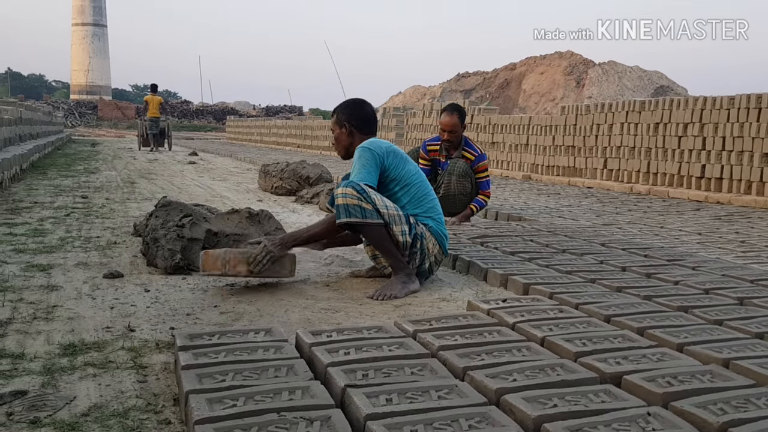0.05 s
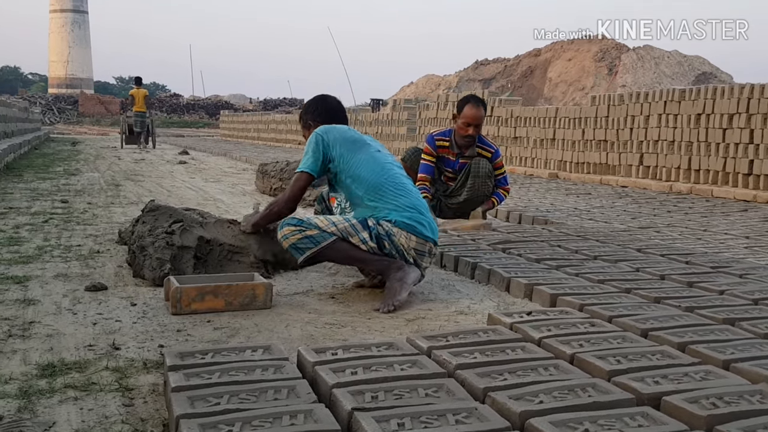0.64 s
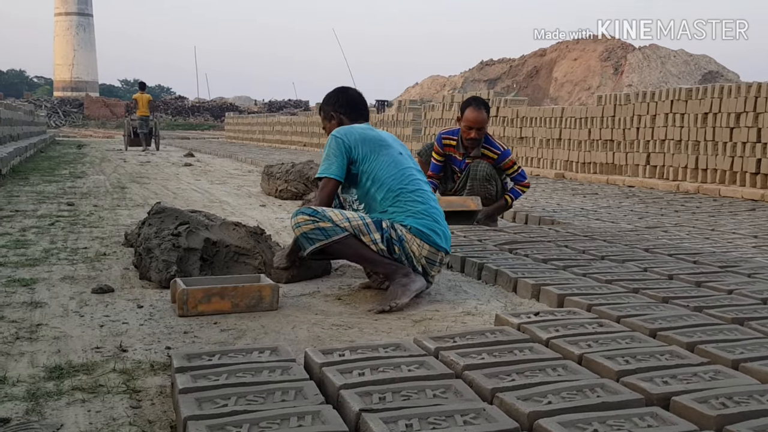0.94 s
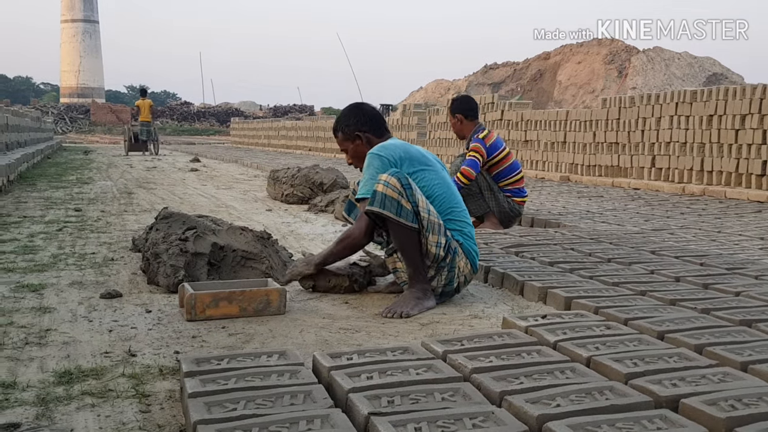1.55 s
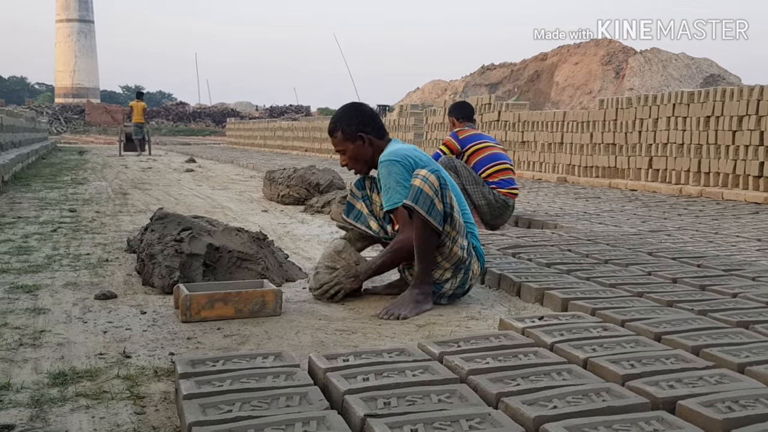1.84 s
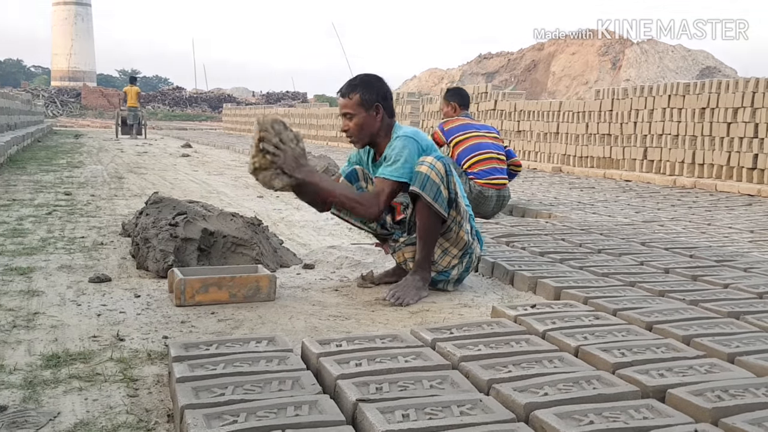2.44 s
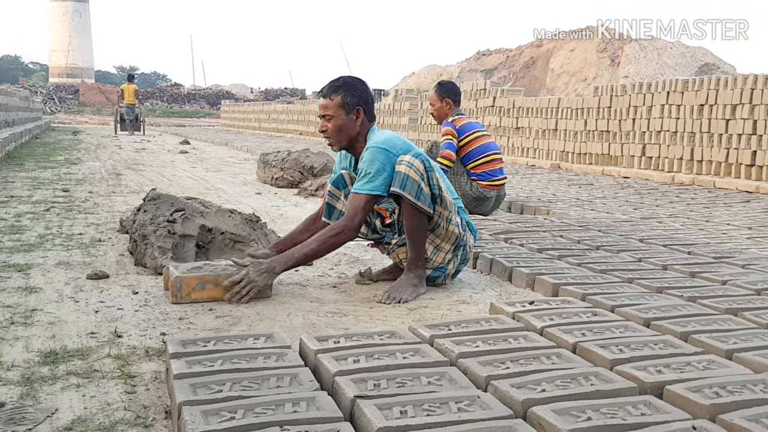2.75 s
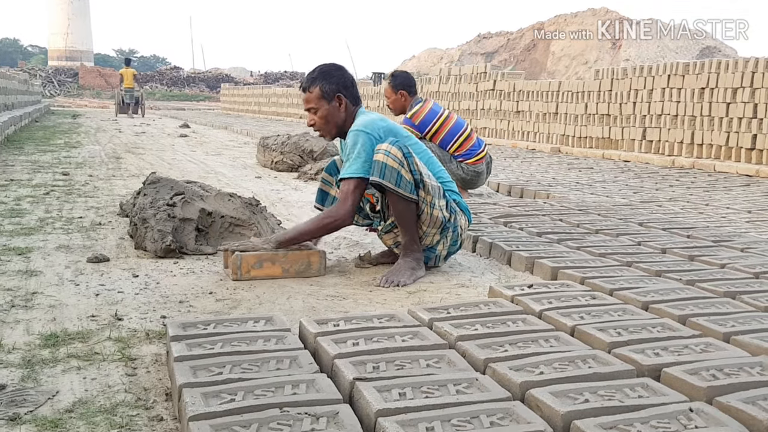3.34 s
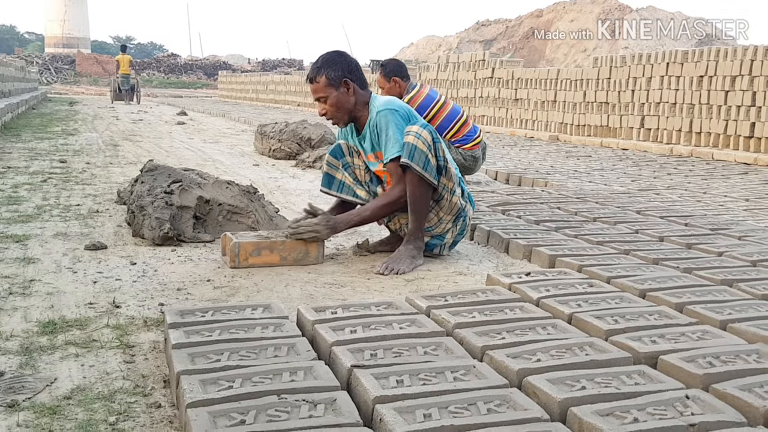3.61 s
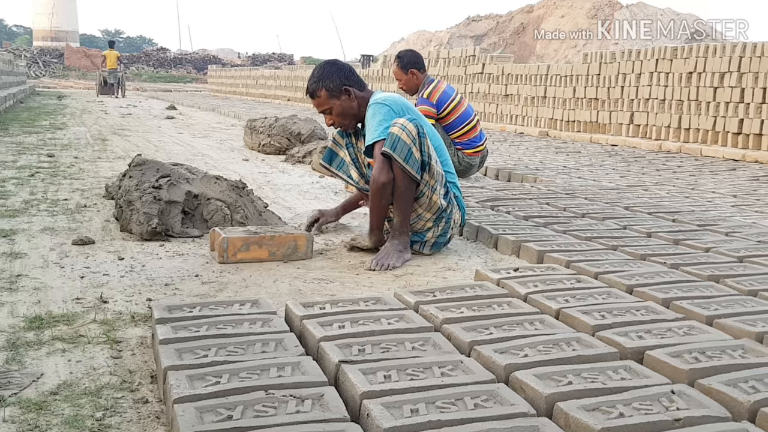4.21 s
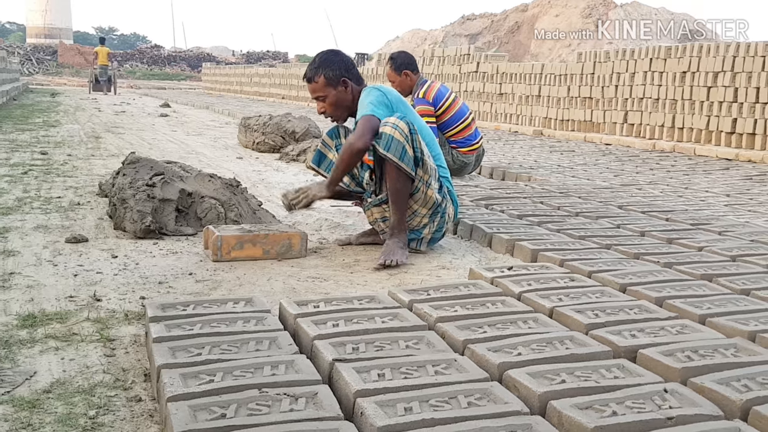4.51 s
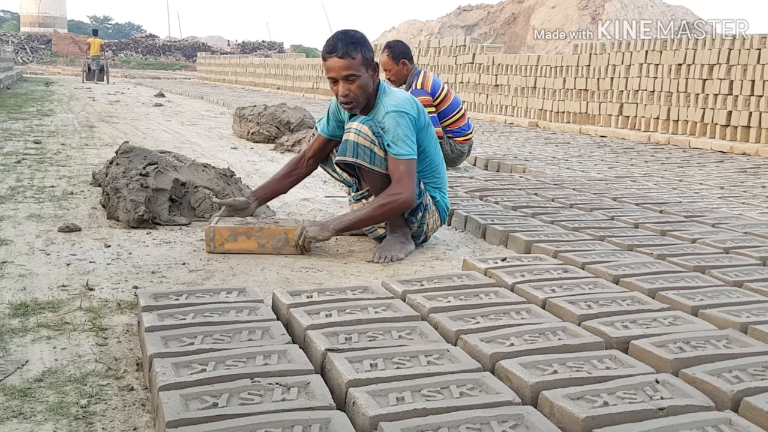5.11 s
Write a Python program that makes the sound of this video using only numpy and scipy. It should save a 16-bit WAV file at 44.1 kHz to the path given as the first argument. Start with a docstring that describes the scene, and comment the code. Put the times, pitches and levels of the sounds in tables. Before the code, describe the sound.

A slow one-cylinder diesel engine chugs across an open brick yard throughout, about eight low puffs a second over a soft rumble. Close by, at 0.1 seconds, an empty wooden mould lands with a hollow double knock. Hands slap and squish wet clay at 0.3 and 0.5 seconds, then give one heavy, hollow smack at 1.1, the loudest slap. Lighter pats come at 1.6 and 2 seconds as the lump is rolled in faintly hissing sand. At 2.7 seconds the clay splats into the mould. Two soft wooden knocks follow at 3, and at 3.3 the full mould hits the earth with a strong, dull, slightly gritty thump. A light knock and pat come near 3.7, a small click just after 4, and quiet smears near 4.9. Small birds whistle faintly far off now and then.

```python
"""A brick moulder works on open ground. First his empty wooden mould knocks down and rings; then he
slaps the wet clay, tears off a lump and rolls it in hissing sand. At 2.7 s the lump splats into the
mould, at 3.3 s the full mould is bumped on the earth, and a light knock, a click and smears follow.
Throughout, the exhaust puffs of a slow one-cylinder diesel echo off brick stacks across the yard,
and small birds whistle far off."""
import sys
import numpy as np
from scipy import signal
from scipy.fft import rfft, irfft
from scipy.io import wavfile
from scipy.ndimage import uniform_filter1d

SR = 44100
rng = np.random.default_rng(int(sys.argv[2]) if len(sys.argv) > 2 else 0)


def unload_audio(sound):
    """Save the sound as a 16-bit wav file, at the path given as the first command line argument."""
    columns = np.transpose(np.atleast_2d(sound))
    # keep every value between -1 and 1, then stretch to whole-number steps
    steps = np.round(np.clip(columns, -1, 1) * 32767)
    wavfile.write(sys.argv[1], SR, steps.astype(np.int16))


N = 227905
TIME = np.arange(N) / SR
AGE = TIME[:SR // 2]  # time since a blow [s]

# palms on clay: (time [s], smack [dB], pitch of the palm's hollow [Hz], lump thud [dB], trapped air [dB])
SLAPS = [(0.291, -31, 420, -52, -58), (0.3038, -32, 404, -20.5, -30.5), (0.457, -27.5, 301, -53, -48),
         (0.497, -36, 321.3, -48, -41.5), (1.069, -13.5, 399.4, -17.5, -17), (1.643, -29.5, 384, -45, -34),
         (1.976, -52, 407, -30.5, -54), (2.073, -45.5, 522, -58, -54), (3.76, -38, 514, -54, -44.5)]
# air pocket under a cupped palm: (frequency [multiple of the hollow's pitch], level [dB], peak time [s])
POCKET_PARTIALS = [(1.001, 0, .0195), (1.87, -18.5, 0.0091)]
# clay squeezed by hand: (time [s], level [dB], pitch of the hand's hollow [Hz], decay time [s])
SMEARS = [(0.301, -50, 790, 0.02), (0.461, -56.5, 740, .03), (.498, -48.5, 710, .012),
          (.951, -55, 512, 0.024), (1.642, -48, 1140, 0.012), (1.921, -66, 1603, .04),
          (2.285, -61, 900, 0.05), (3.003, -57, 1100, 0.044), (3.735, -60, 1090, 0.031),
          (3.756, -53.5, 539, 0.032), (4.856, -58.5, 850, 0.019), (4.916, -57, 1130, 0.029)]
# clay fills the mould: (time [s], thud [dB], thud frequency [Hz], spatter [dB], spatter decay time [s])
SPLATS = [(2.7083, -17.5, 734, -30.5, 0.014), (2.7286, -27, 371.5, -25, 0.0065),
          (2.743, -26.5, 353, -27.5, 0.0043)]
# spectra of yielding clay, spattering clay, crunching sand, a blow on earth: (frequency [Hz], level [dB])
SQUISH = [(150, -10), (400, 9.5), (700, 1.5), (1150, -4), (1400, -6.5), (1900, -14), (2400, -34),
          (3200, -22), (4400, -19.5), (6000, -42), (14000, -42.5)]
SPATTER = [(120, -8), (330, 6.5), (850, 0), (1300, -2), (1700, -8.5), (2100, -16.5), (2600, -14.5),
           (4700, -20.5), (5700, -34), (7700, -40), (10000, -52), (15000, -60)]
SAND = [(300, -16), (900, 4.5), (1500, 7.5), (2000, -0.5), (2800, -9), (3650, 3), (4200, -5), (5000, -11),
        (5700, -19), (6800, -19), (7600, -10), (8800, -28), (15000, -42)]
EARTH_BLOW = [(40, -24.5), (90, 0), (250, 2), (350, 2), (480, -0.5), (800, -15.5), (1100, -28), (1500, -52),
              (2800, -57), (8000, -100)]
# modes of the full mould, the empty mould and a small hard object: (frequency [Hz], level [dB], t60 [s])
FULL_MOULD_MODES = [(134.9, 1, 0.12), (289, 0, 0.16), (375.3, -1.5, 0.21), (418, 3.5, 0.14),
                    (461, -12, 0.13), (802, -0.5, 0.037)]
EMPTY_MOULD_MODES = [(308.6, -4.5, 0.38), (385.4, 0.5, 0.085), (454, 1.5, 0.18), (524, 7.5, 0.033),
                     (733, 0.5, 0.038), (884, -4.5, 0.055), (956, -3, 0.078), (1003, 0, 0.029),
                     (1243, -19, 0.082), (1650, -11.5, 0.036), (1950, -35, .05)]
CLICK_MODES = [(716, 5, 0.014), (990, 2, 0.018), (1302, -3, 0.012), (1680, -4, .022), (2550, -10, 0.03),
               (3480, -12, .012), (7900, -18, .01)]
# mould on the ground: (time [s], level [dB], contact cut-off [Hz], grit [dB], grit decay time [s])
KNOCKS = [(0.124, -29.5, 1300, -57.5, 0.012), (0.152, -22.5, 1690, -56.5, 0.01),
          (2.999, -36, 1604, -68, 0.02), (3.027, -33, 1401, -69, .02), (3.734, -40.5, 1298, -69, .015)]
# the lump is dragged and rolled: (time [s], duration [s], relative rub [dB], relative sand hiss [dB])
STROKES = [(-.1, 0.85, -67, -75.5), (0.807, 0.65, -70.5, -73.5), (1.433, 0.37, -65, -93),
           (1.851, 0.41, -66.5, -71), (2.188, 0.93, -67.5, -75), (2.997, 0.61, -76, -78),
           (4.0, 0.61, -86, -74.5), (4.5, 0.87, -72, -72)]
# engine speed: (time [s], firing rate [Hz])
FIRING_RATE = [(0, 8.39), (.5, 8.36), (1.5, 8.35), (2, 8.28), (2.5, 8.335), (3, 8.32), (3.5, 8.28),
               (4.3, 8.34), (5.2, 8.31)]
# spectra of an exhaust puff and of the valve gear's metallic tick: (frequency [Hz], level [dB])
PUFF = [(30, -32.5), (55, -20), (100, -4.5), (200, 0), (320, 1), (370, -7.5), (460, -12), (570, -36),
        (1000, -50), (2000, -84)]
VALVE_TICK = [(700, -11.5), (1000, 0), (1500, -5), (2800, -23), (3600, -3.5), (4400, -13), (5400, -19),
              (14000, -38)]
# modes of the exhaust pipe and silencer: (frequency [Hz], level [dB], t60 [s])
PIPE_MODES = [(79, -26.5, 0.36), (99.9, 17.5, 0.89), (133.44, 23, 1), (232, -38, 0.278), (316, -18, .3)]
# reflections of the puff from brick stacks: (delay [s], level [dB])
STACK_ECHOES = [(.0095, -12.5), (0.0193, -16), (0.0261, -11.5), (0.0302, -13), (0.043, -16), (0.054, -37),
                (0.087, -12)]
# bird calls: (time [s], duration [s], start pitch [Hz], middle [Hz], end [Hz], relative level [dB])
WHISTLES = [(.04, .08, 3250, 3120, 3000, -79), (.82, .14, 3400, 3820, 3750, -71),
            (1.26, .135, 3180, 3260, 2830, -66), (2.07, .14, 4100, 3780, 3450, -73),
            (2.44, .155, 3300, 3080, 2720, -68), (4.76, .11, 4100, 3820, 3400, -73),
            (5.11, .1, 3150, 3150, 2950, -69)]
# spectra of the yard's rumble and of the open air: (frequency [Hz], level [dB])
RUMBLE = [(20, -18), (38, -6.5), (52, -2.5), (80, 6.5), (120, 2), (300, -5), (430, -9.5), (560, -25.5),
          (750, -34.5), (1500, -50)]
AIR = [(410, -28.5), (700, -14.5), (766, -10), (838, 2.5), (977, 7), (1590, -12.5), (1900, -5),
       (2250, -20.5), (2830, -12.5), (3610, -12.5), (4110, -13.5), (4980, -18.5), (5880, -25),
       (7510, -15.5), (15000, -30)]


def hands(lump_hz=191, lump_lag_s=.0005, tear_s=.487):
    """Inelastic impact: a slap shakes the lump and traps air; slower shear smears and tears the clay."""
    out = np.zeros(N)
    for s, smack_db, hollow_hz, lump_db, pocket_db in SLAPS:
        skin_snap = undb(-20.5) * crackle(SPATTER, decay_s=.0024)
        wet = undb(-25.5) * squish(hollow_hz=820, decay_s=.013)
        add(out, s, undb(smack_db) * (thud(hollow_hz, cycles=.77) + skin_snap + wet))
        add(out, s + lump_lag_s, undb(lump_db) * thud(lump_hz, cycles=.81))
        add(out, s, undb(pocket_db) * air_pocket(hollow_hz))
    for s, db, hollow_hz, decay_s in SMEARS:
        add(out, s, undb(db) * squish(hollow_hz, decay_s))
    sticky_rip = noise(SAND, len(AGE), grain_db=8) * swell(peak_s=.014) ** 2
    add(out, tear_s, undb(-65) * sticky_rip)
    return out


def air_pocket(hz, flutter_db=1.5):
    """Cavity resonance: trapped air sounds a short hollow note, unevenly as the clay closes on it."""
    note = sum(undb(db) * swell(peak_s) ** 2.9 * np.sin(2 * np.pi * multiple * hz * AGE)
               for multiple, db, peak_s in POCKET_PARTIALS)
    return note * undb(flutter_db * walk(180)[:len(AGE)])


def squish(hollow_hz, decay_s, resonance_db=11):
    """Source and filter: wet clay crackles as it yields, and the hand's hollow stresses one band."""
    rise_s = .25 * decay_s
    wet = crackle(SQUISH, decay_s) * (1 - np.exp(-AGE / rise_s))
    hollow = signal.iirpeak(hollow_hz, Q=1.8, fs=SR)
    return wet + undb(resonance_db) * signal.lfilter(*hollow, signal.lfilter(*hollow, wet))


def throw():
    """Plastic deformation: the lump stops dead in the mould and spatters into its corners."""
    out = np.zeros(N)
    for s, db, hz, spatter_db, decay_s in SPLATS:
        add(out, s, undb(db) * thud(hz, cycles=1) + undb(spatter_db) * crackle(SPATTER, decay_s))
    return out


def bump(time_s=3.3306):
    """Damped vibration: the clay-filled mould hits the sandy earth and hums only briefly."""
    body = undb(-24) * ring(FULL_MOULD_MODES)
    crunch = undb(-39) * crackle(SAND, decay_s=.0063)
    settling_grains = undb(-58) * crackle(SAND, decay_s=.046)
    out = np.zeros(N)
    add(out, time_s, undb(-11) * response(EARTH_BLOW))
    add(out, time_s, body + crunch + settling_grains)
    return out


def knocks():
    """Impact excitation: the wooden box rings on grit; softer contact excites fewer high modes."""
    out, wood = np.zeros(N), ring(EMPTY_MOULD_MODES)
    for s, db, contact_hz, grit_db, decay_s in KNOCKS:
        contact = signal.butter(4, contact_hz, fs=SR, output="sos")
        add(out, s, undb(db) * signal.sosfilt(contact, wood))
        add(out, s, undb(grit_db) * crackle(SAND, decay_s))
    return out


def click(time_s=4.0628):
    """Hard contact: a small object rings in high, short-lived modes and scrapes the sand."""
    out = np.zeros(N)
    add(out, time_s, undb(-38) * ring(CLICK_MODES) + undb(-62) * crackle(SAND, decay_s=.034))
    return out


def rubbing(rub_gain_db=-6, sand_gain_db=-5):
    """Friction noise: clay drags unevenly and sand hisses; a faint rustle stays between strokes."""
    # the strokes and the resting rustle add in power
    rub_power = undb(-79) ** 2 + sum((undb(db) * stroke(s, span)) ** 2 for s, span, db, _ in STROKES)
    sand_power = undb(-83) ** 2 + sum((undb(db) * stroke(s, span)) ** 2 for s, span, _, db in STROKES)
    drag = noise([(300, -11.5), (650, -4.5), (1150, -2), (1450, -9), (1900, -13.5), (2300, -34.5),
                  (6000, -31.5)], N, grain_db=-2)
    grains = noise([(2000, -6), (2850, -14.5), (3300, 3.5), (4200, 4), (4750, -4), (5400, -19.5),
                    (8000, -10), (14000, -33)], N, grain_db=4)
    drag *= np.sqrt(rub_power) * undb(rub_gain_db + 2 * walk(29))
    grains *= np.sqrt(sand_power) * undb(sand_gain_db + .75 * walk(30))
    return drag + grains


def stroke(s, length_s, attack_s=.064, release_s=.12):
    """Contact pressure: one stroke of the arms builds, holds and lets go."""
    return np.clip(np.minimum((TIME - s) / attack_s, (s + length_s - TIME) / release_s), 0, 1)


def engine(first_firing_s=.052, valve_lead_s=.0043, scatter_s=.024, uneven_db=.5, echo_uneven_db=1.86):
    """Pulse excitation: after a valve tick, each puff rings the pipe and reflects off the stacks."""
    cycles = np.cumsum(np.interp(TIME, *np.transpose(FIRING_RATE))) / SR
    firings = first_firing_s + np.interp(np.arange(int(cycles[-1]) + 1), cycles, TIME)
    firings = np.append(2 * firings[0] - firings[1], firings)  # the engine is already running
    puff = -undb(-28.5) * response(PUFF)
    pipe = undb(-52) * ring(PIPE_MODES)
    # rows of bricks scatter every puff in the same way
    scattered = undb(-55) * noise(PUFF, len(AGE)) * np.exp(-AGE / scatter_s)
    out = np.zeros(N)
    for s in firings:
        strength = undb(uneven_db * rng.standard_normal())
        add(out, s, strength * puff)
        add(out, s, strength * (pipe + scattered))
        add(out, s - valve_lead_s, undb(-64.5) * crackle(VALVE_TICK, decay_s=.0072))
        for delay, db in STACK_ECHOES:
            add(out, s + delay, strength * undb(db + echo_uneven_db * rng.standard_normal()) * puff)
    return out


def birds(gain_db=1, warble=.011, flutter_db=3.5):
    """Frequency modulation: thin whistles glide and warble, smeared by scattering on their way."""
    out = np.zeros(N)
    for s, length_s, start_hz, middle_hz, end_hz, db in WHISTLES:
        progress = np.linspace(0, 1, int(length_s * SR))
        glide = np.polyfit([0, .5, 1], [start_hz, middle_hz, end_hz], 2)
        hz = np.polyval(glide, progress) * (1 + warble * walk(300)[:len(progress)])
        envelope = undb(db + gain_db) * np.sin(np.pi * progress ** 1.4)
        add(out, s, envelope * np.sin(2 * np.pi * np.cumsum(hz) / SR))
    return scatter(out * undb(flutter_db * walk(60)), echo_db=-7, peak_s=.01)


def yard(rumble_db=-48, air_db=-74.5):
    """Diffuse field: the engine's rumble wavers under a faint steady hiss."""
    return noise(RUMBLE, N) * undb(rumble_db + walk(5.3)) + noise(AIR, N) * undb(air_db)


def scatter(x, echo_db, peak_s):
    """Scattering: the brick rows add a dense, short echo to the direct sound."""
    echo = rng.standard_normal(len(AGE)) * swell(peak_s)
    return x + undb(echo_db) * signal.fftconvolve(x, echo / np.linalg.norm(echo))[:N]


def thud(hz, cycles):
    """Heavy damping: the swing of a soft blow peaks after `cycles` periods and soon dies."""
    return -swell(cycles / hz) ** 2 * np.sin(2 * np.pi * hz * AGE)


def crackle(spectrum, decay_s, rise_s=.002):
    """Granular noise: a burst of tiny clicks fades exponentially."""
    return noise(spectrum, len(AGE), grain_db=10) * np.exp(-AGE / decay_s) * (1 - np.exp(-AGE / rise_s))


def ring(modes):
    """Modal superposition, peak 1: decaying sines, with neighbours in opposite phase."""
    x = sum((-1) ** k * undb(db) * np.exp(-np.log(1000) * AGE / t60) * np.sin(2 * np.pi * hz * AGE)
            for k, (hz, db, t60) in enumerate(modes))
    return x / np.abs(x).max()


def swell(peak_s):
    """Critically damped envelope: it rises to 1 at peak_s and dies away."""
    return AGE / peak_s * np.exp(1 - AGE / peak_s)


def noise(spectrum, count, grain_db=0):
    """Filtered noise of rms 1; grain_db spreads the sizes of its tiny clicks."""
    clicks = rng.standard_normal(count) * undb(grain_db * rng.uniform(-.86, 1, count))
    return unit(signal.fftconvolve(clicks, response(spectrum))[:count])


def response(spectrum, size=8192):
    """Minimum-phase impulse response, peak 1, of a spectrum (frequency [Hz], level [dB])."""
    hz, db = np.transpose(spectrum)
    bin_hz = np.maximum(np.fft.rfftfreq(size, 1 / SR), 1)
    gain = undb(np.interp(np.log(bin_hz), np.log(hz), db))
    cepstrum = irfft(np.log(gain))
    cepstrum[1:size // 2] *= 2  # folding onto positive time makes the response causal
    cepstrum[size // 2 + 1:] = 0
    impulse = irfft(np.exp(rfft(cepstrum)))
    return impulse / np.abs(impulse).max()


def walk(rate_hz):
    """Random modulation of rms 1: smoothed steps, rate_hz of them a second."""
    hold = int(SR / rate_hz)
    steps = np.repeat(rng.standard_normal(N // hold + 1), hold)
    return unit(uniform_filter1d(uniform_filter1d(steps, hold), hold)[:N])


def undb(db):
    """Decibels to amplitude ratio."""
    return 10 ** (np.asarray(db) / 20)


def unit(x):
    """Normalisation to rms 1."""
    return x / np.sqrt(np.mean(x ** 2))


def add(out, s, x):
    """Superposition: x joins out from time s on."""
    onset = int(round(s * SR))
    start, end = max(onset, 0), min(onset + len(x), len(out))
    if end > start:
        out[start:end] += x[start - onset:end - onset]


def scene():
    """Superposition in one channel: the moulder near by, the engine and birds beyond."""
    work = scatter(knocks() + click() + hands() + throw() + bump(), echo_db=-14, peak_s=.013)
    return (work + rubbing() + engine() + birds() + yard())[None]


def record(dry, low_hz=42, top_hz=15500):
    """Band limiting: a high-pass thins the deepest bass and a steep low-pass cuts the top."""
    thinned = signal.sosfilt(signal.butter(3, low_hz, "high", fs=SR, output="sos"), dry)
    return signal.sosfilt(signal.ellip(10, .2, 70, top_hz, fs=SR, output="sos"), thinned)


dry = scene()
out = record(dry)
unload_audio(out)
```